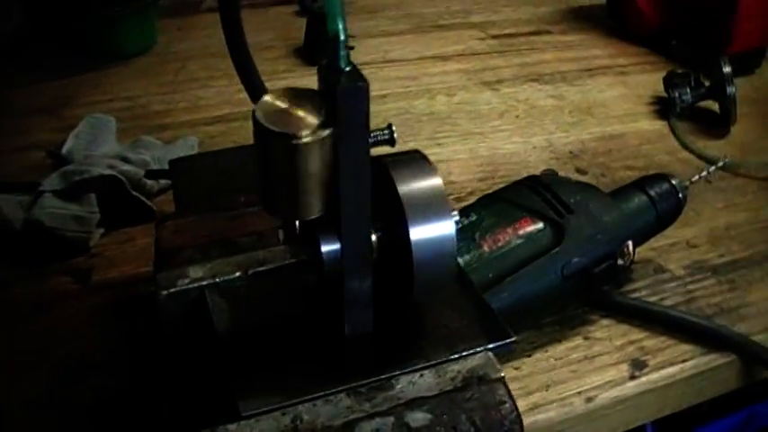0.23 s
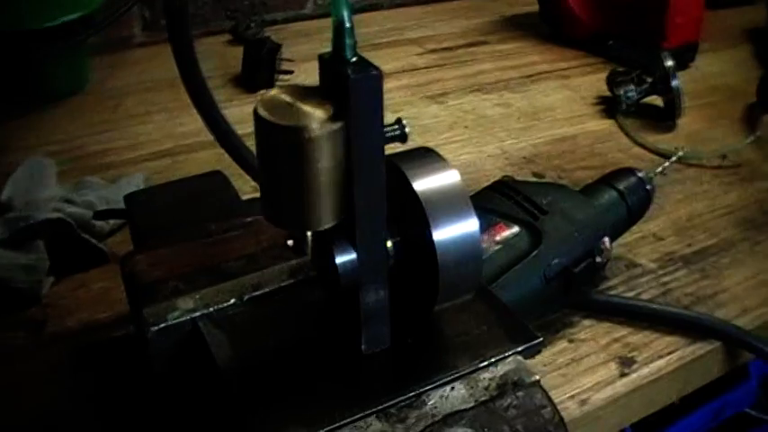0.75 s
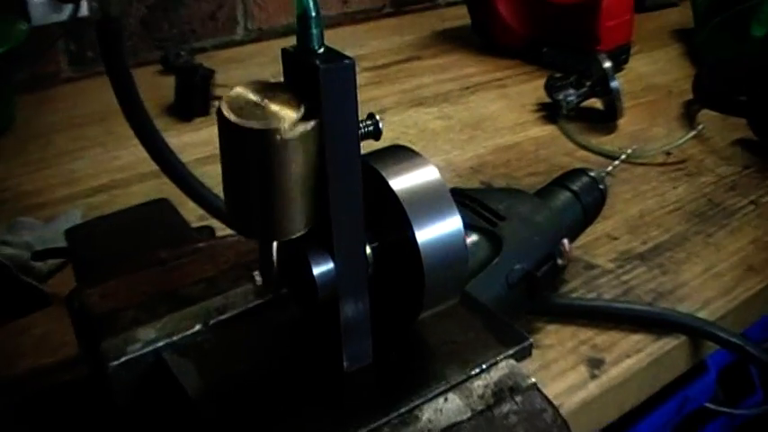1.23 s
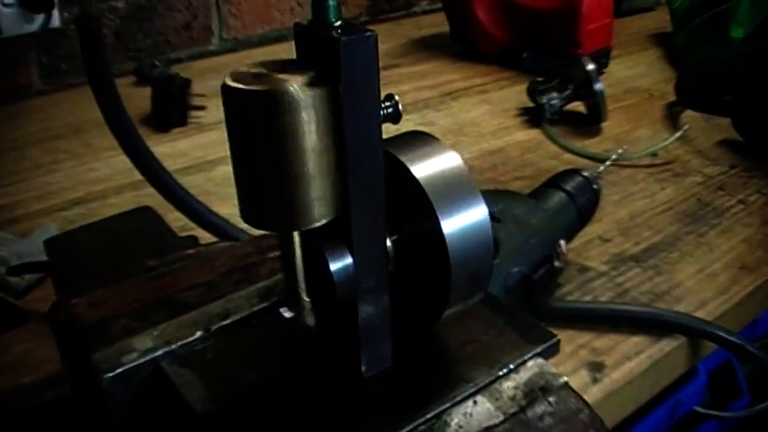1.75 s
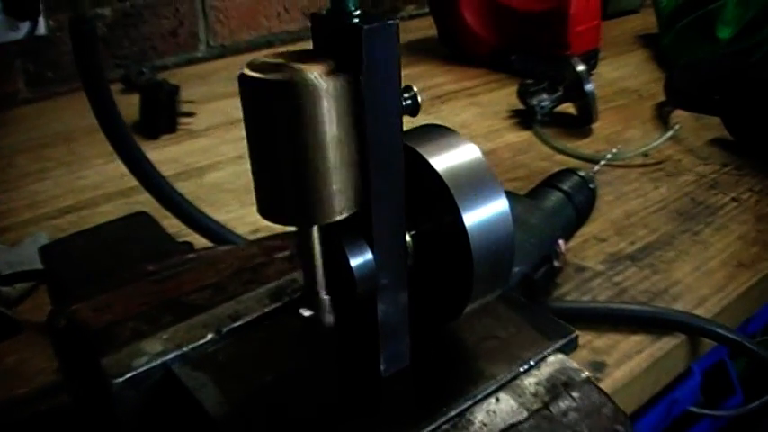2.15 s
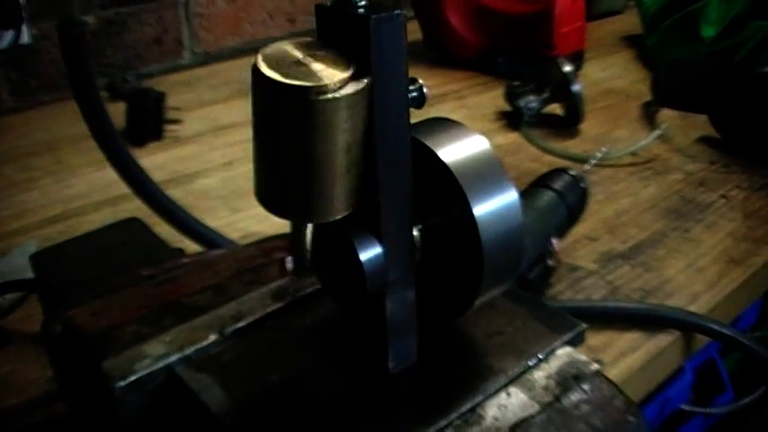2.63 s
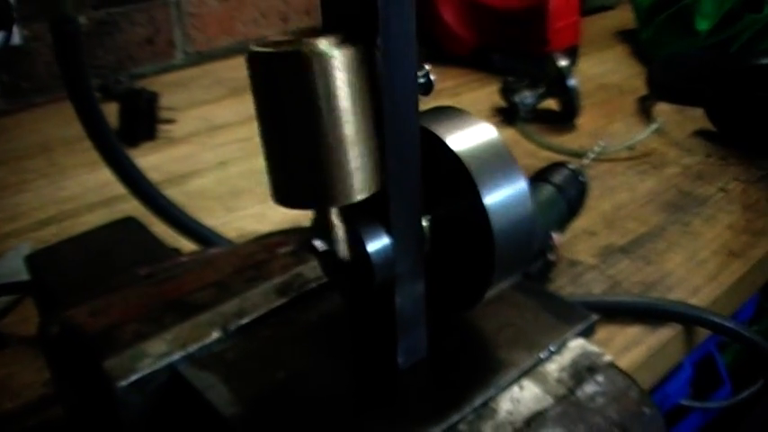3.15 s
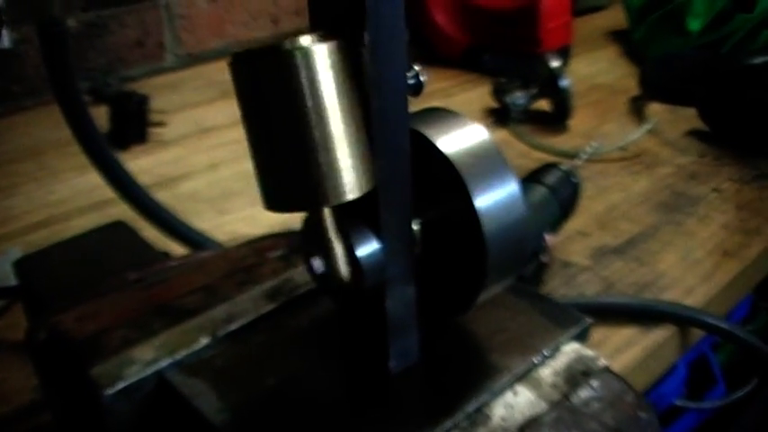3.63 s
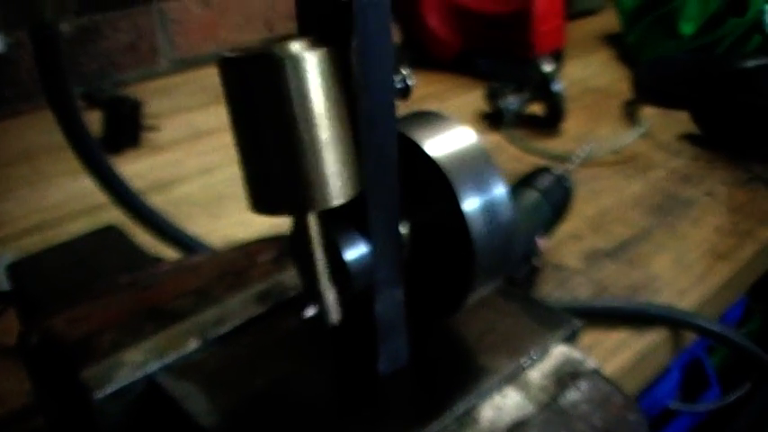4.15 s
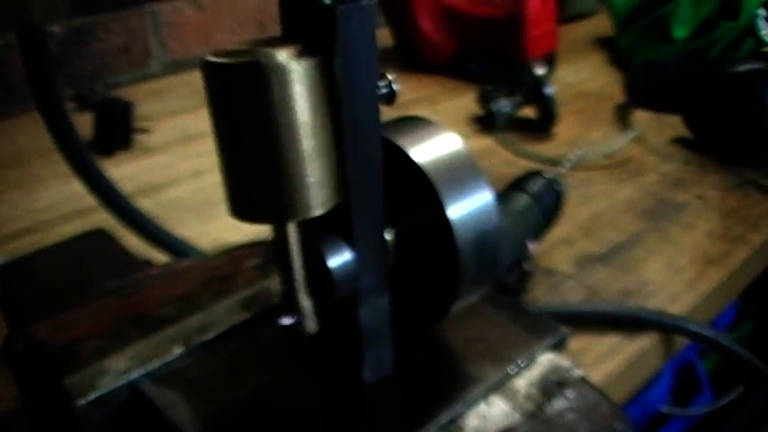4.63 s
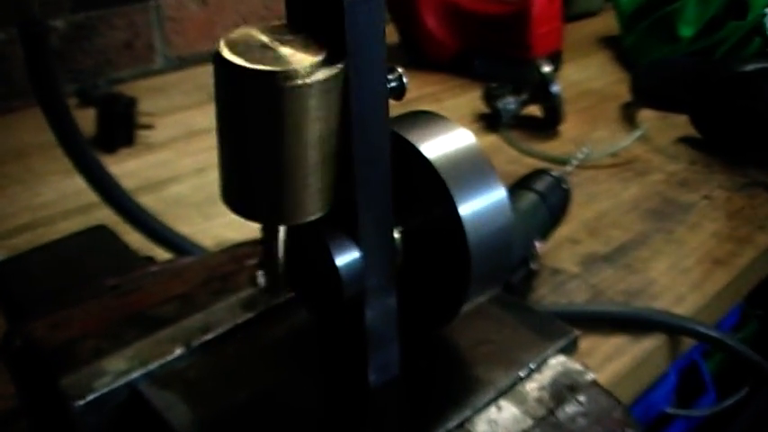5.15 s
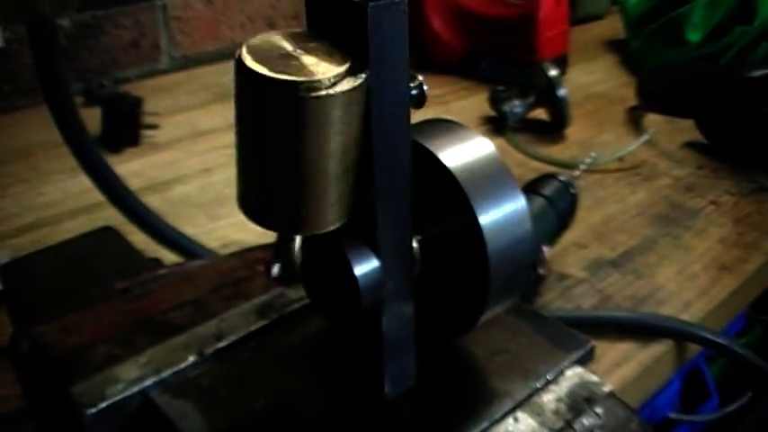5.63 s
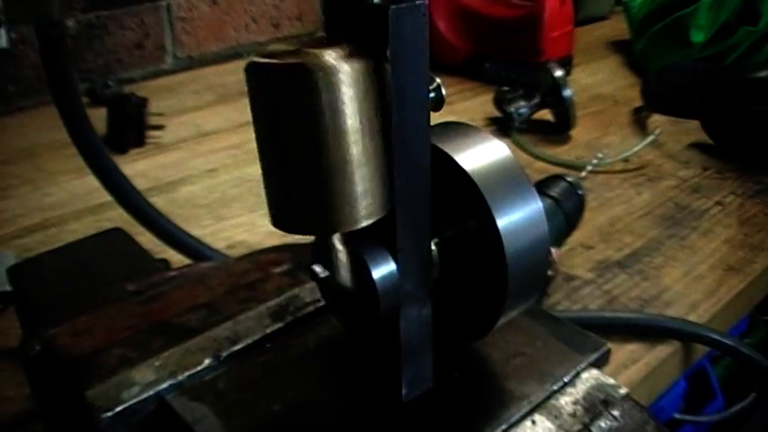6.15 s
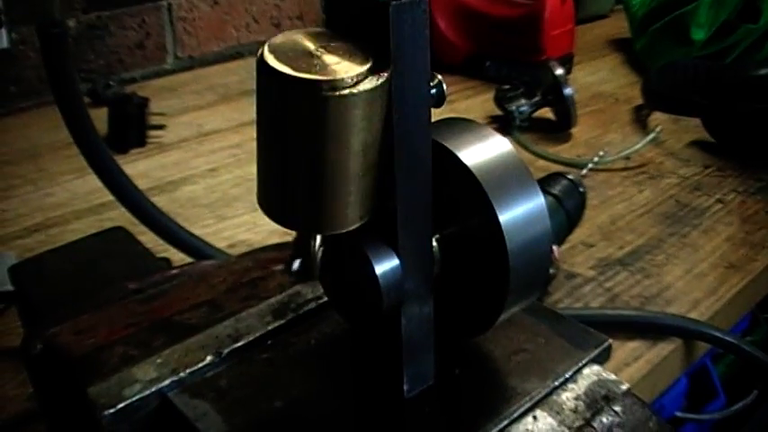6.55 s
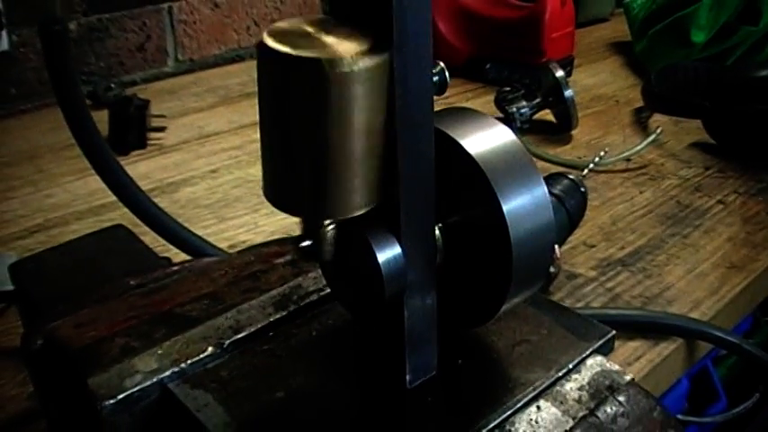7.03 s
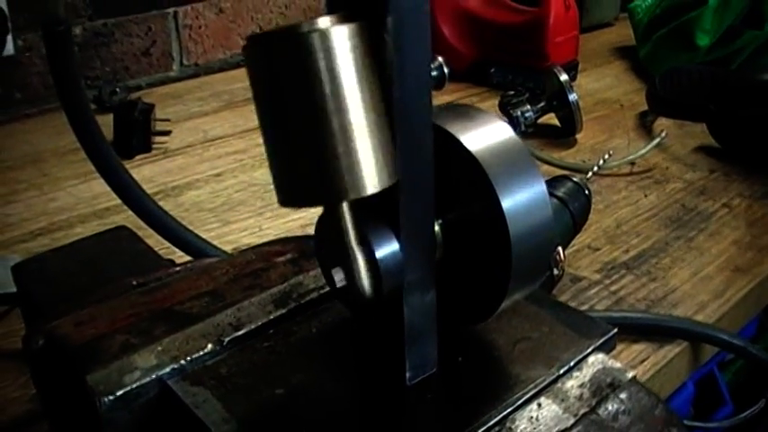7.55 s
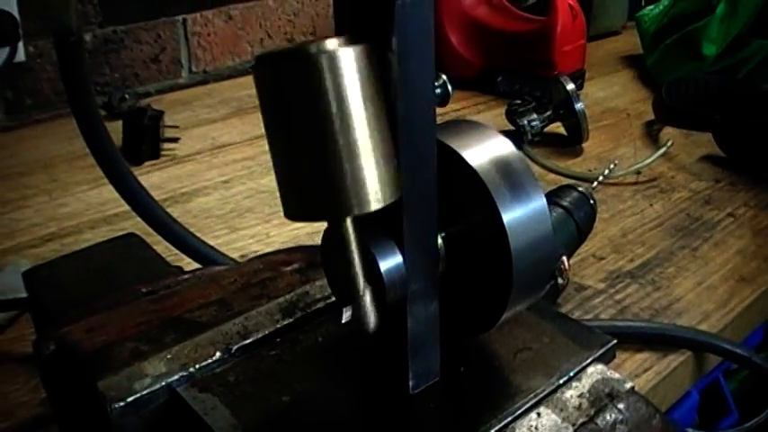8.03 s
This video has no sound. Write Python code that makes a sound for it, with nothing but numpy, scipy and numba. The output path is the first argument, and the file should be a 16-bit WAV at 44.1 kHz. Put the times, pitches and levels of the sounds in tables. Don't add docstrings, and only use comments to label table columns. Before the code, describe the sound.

A small metal air engine knocks and clicks rapidly on a workbench, puffing exhaust and hissing, slowing from six to about four beats a second.

```python
import sys
import numpy as np
from scipy import signal
from scipy.fft import rfft, irfft
from scipy.io import wavfile
from scipy.ndimage import uniform_filter1d
from numba import njit

SR = 44100
rng = np.random.default_rng(int(sys.argv[2]) if len(sys.argv) > 2 else 0)


def pcm_store(signal):
    levels = np.round(np.clip(np.atleast_2d(signal), -1, 1) * 32767)
    wavfile.write(sys.argv[1], SR, levels.astype(np.int16).T)


def level_to_linear(level):
    exponent = np.asarray(level, float) / 20
    return 10 ** exponent


N = 365588


def level(x, db):
    return x * level_to_linear(db) / np.sqrt(np.mean(x ** 2))


def colour(x, points, share=1):
    hz, db = np.transpose(points)
    bins = np.fft.rfftfreq(x.shape[-1], 1 / SR) + 1
    gain = level_to_linear(share * np.interp(np.log(bins), np.log(hz), db))
    return irfft(rfft(x) * gain, x.shape[-1])


@njit
def svf(x, hz, width):
    y, b, l = np.empty(len(x)), 0., 0.
    for i in range(len(x)):
        g, k = np.tan(np.pi * hz[i] / SR), width / hz[i]
        v = (b + g * (x[i] - l)) / (1 + g * (g + k))
        b, l, y[i] = 2 * v - b, l + 2 * g * v, k * v
    return y


def flutter(rate_hz, spread_db):
    k = int(SR / rate_hz)
    steps = np.repeat(rng.standard_normal(N // k + 1), k)
    return level_to_linear(spread_db * uniform_filter1d(steps, k)[:N])


def strike(times, peak_db, hz, t60, db, scatter_db, rise_s, size, order=0):
    t = np.arange(size) / SR
    bank = np.sin(2 * np.pi * np.outer(hz, t)) * np.exp(-np.log(1000) * np.outer(1 / np.asarray(t60), t))
    bank *= (1 - np.exp(-t / rise_s)) ** 2
    swing = (-1.) ** (order * np.arange(len(hz)))
    mode_gain = level_to_linear(db + scatter_db * rng.standard_normal((len(times), len(hz))))
    rings = (swing * mode_gain) @ bank
    out = np.zeros(N + SR + size)
    for s, top_db, ring in zip(times, peak_db, rings):
        i = int((s + 1) * SR)
        out[i:i + size] += ring * level_to_linear(top_db) / np.abs(ring).max()
    return out[SR:SR + N]


def passes(turn, place):
    return np.flatnonzero(np.diff((turn - place) // 1)) / SR


def at(curve, s):
    return curve[(np.maximum(s, 0) * SR).astype(int)]


def control(table):
    return np.interp(np.arange(N) / SR, *np.transpose(table))


# frequency in Hz, level in dB per Hz.
SHOP = [(20, -16), (60, -11.5), (214, 1.5), (466, -4.5), (936, -8.5), (1550, -8.5), (2000, -18),
        (3000, -18), (9000, -46), (12500, -46), (15700, -48)]
SHOP_DB = -51
HUM_HZ, HUM_WIDTH_HZ, HUM_DB = 68.4, 13, -68


def workshop():
    mid, side = rng.standard_normal((2, N))
    hush = level(colour(np.array([mid + 0.5 * side, mid - 0.49 * side]), SHOP), SHOP_DB)
    centre = np.full(N, 1. * HUM_HZ)
    hum = [level(svf(n, centre, 1. * HUM_WIDTH_HZ), HUM_DB) for n in (mid + 0.92 * side, mid - 0.97 * side)]
    return hush + hum


# time in seconds, speed in turns per second.
SPEED = [
    (0, 6.1433),
    (.5, 6.1503),
    (1.2, 5.6527),
    (2, 4.9515),
    (2.8, 4.5146),
    (3.5, 4.3253),
    (4.2, 4.2745),
    (5, 4.3321),
    (6, 4.3765),
    (8.29, 4.4141),
]
START_TURN, IDLE_TURNS_S = .1033, 4.35


def crank():
    speed = control(SPEED)
    return START_TURN + np.cumsum(speed) / SR, speed - IDLE_TURNS_S


# time in seconds, force in dB.
BLOW = [(0, -28), (.12, -16.5), (1.15, -16.5), (1.4, -17.5), (2.1, -19), (2.95, -21), (4.2, -20.5),
        (5, -20), (5.35, -19.5), (5.75, -20.5), (6.2, -19), (7.2, -19), (8, -19), (8.25, -17)]


def blow_db(s):
    return at(control(BLOW), s)


# frequency in Hz, T60 in seconds, level in dB from the knock, in dB from the exhaust jolt.
BENCH = [(141.2, 0.17, -33, -2.5), (198, 0.19, -6, -14), (229.3, 0.16, -17, -1.5), (314, 0.15, 3.5, -41),
         (369.5, 0.26, -1.5, -3.5), (449.3, 0.12, 5, 0.5), (489.3, 0.046, 11, 11.5), (590, 0.15, -9, 1.5),
         (654.5, 0.14, 1.5, -4), (764, 0.072, 8, -3), (846, 0.19, -3, -14.5), (876, 0.03, 8, 6.5),
         (1064, 0.11, 2, -43)]
# frequency in Hz, T60 in seconds, level in dB struck by crank pin, cylinder, rod, pivot.
FRAME = [(1188, 0.14, -14.5, -27, -22.5, -19), (1283.5, 0.019, 4.5, -29, -14, -32.5),
         (1392, 0.029, 5.5, 0.5, -24, -5), (1460, 0.014, 3.5, 15, 3.5, 11),
         (1553, 0.024, -54, 11.5, -2.5, 8), (1839, 0.053, -10, 6, -56, 1),
         (2273, 0.012, -9.5, -33, -23, -39)]
# frequency in Hz, T60 in seconds, level in dB.
PIN_RING = [(2260, 0.036, -15), (2860, 0.03, -39), (3010, 0.063, -4.5), (3230, 0.013, -2), (3453, 0.016, 3),
            (3820, 0.0058, 2), (4123, 0.029, -0.5), (4820, 0.0096, -5), (5080, 0.014, -3)]
BLOW_SCATTER_DB = .5
RATTLE_DB, RATTLE_PER_BLOW, RATTLE_SCATTER_DB = -31.5, 2.26, 1


def crank_pin_knock(turn):
    s = np.r_[-START_TURN / SPEED[0][1], passes(turn, 0)]
    chance = rng.standard_normal((2, len(s)))
    force_db = blow_db(s)
    frame_db = force_db + BLOW_SCATTER_DB * chance[0]
    rattle_db = RATTLE_DB + RATTLE_PER_BLOW * (force_db + 20) + RATTLE_SCATTER_DB * chance[1]
    frame, bench = np.transpose(FRAME), np.transpose(BENCH)
    out = strike(s, frame_db, *frame[:3], scatter_db=.6, rise_s=.001, size=6000)
    bench_db = -31.0 + 0.17 * (frame_db + 21)
    out += strike(s, bench_db, *bench[:3], scatter_db=1.7, rise_s=0.0042, size=16000, order=1)
    out += strike(s, rattle_db, *np.transpose(PIN_RING), scatter_db=0.5, rise_s=0.0002, size=3000)
    crack_hz = 2100 + 450 * np.arange(12)
    crack_db = -4 * np.log2(crack_hz / 3000)
    return out + strike(s, rattle_db - 4.0, crack_hz, np.full(12, .008), crack_db,
                        scatter_db=-4, rise_s=.0001, size=1000, order=1)


AFTER_DB, AFTER_DB_PER_SPEED = -16, 10


def pin_chatter_and_jolt(turn, fast):
    after_db = AFTER_DB + AFTER_DB_PER_SPEED * fast
    chatter = colour(rng.standard_normal(N), [(300, -51), (900, 9), (1400, -20), (2300, 4), (3500, 11.5),
                                              (5000, 1.5), (7000, 3.0), (10000, -9), (14000, -55)])
    fade = uniform_filter1d(np.exp(-(turn % 1) / 0.05), size=16)
    s = passes(turn, 0.17)
    hz, t60, db = np.transpose(FRAME)[:3]
    ring = strike(s, -31.5 + at(after_db, s), hz, t60, db - 6 * np.log2(hz / 1300),
                  scatter_db=-4.0, rise_s=0.0022, size=6000)
    return ring + level(chatter, -27.5) * level_to_linear(after_db) * fade


RUMBLE_DB_PER_SPEED = 5.5


def bench_rumble(turn, fast):
    bench, rumble_db = np.transpose(BENCH), RUMBLE_DB_PER_SPEED * fast
    s = np.r_[0, passes(turn, .09)]
    out = strike(s, -38 + 0.63 * at(rumble_db, s), bench[0], bench[1], bench[3],
                 scatter_db=2.5, rise_s=0.0053, size=16000, order=1)
    s = passes(turn, .4)
    return out + strike(s, -52.5 + 0.99 * at(rumble_db, s), *bench[:2, [0, 2]], np.zeros(2),
                        scatter_db=-0.3, rise_s=0.0037, size=16000, order=1)


EXHAUST, INLET = (.09, .107, .47, .58), (.62, .7, 1.005, 1.035)
LEAK_DB_PER_SPEED = -1.5


def ports(turn, fast, shut_db, *open_db):
    places = EXHAUST + INLET
    shut = np.interp(turn, places, (1, 0, 0, 1, 1, 0, 0, 1), period=1)
    levels = (shut_db, *open_db[:2], shut_db, shut_db, *open_db[2:], shut_db)
    return np.interp(turn, places, levels, period=1) + LEAK_DB_PER_SPEED * fast * shut


PUFF_ENDS, PUFF_GONE, PUFF_DB, PUFF_SHUT_DB = 0.16, .2, -41, -71


def puffing(turn):
    return np.interp(turn % 1, (*EXHAUST[:2], PUFF_ENDS, PUFF_GONE), (0, 1, 1, 0))


def exhaust_puff(turn):
    noise = rng.standard_normal((2, N))
    hz = 3850 + 7000 * np.clip(turn % 1 - .1, 0, .09)
    whistle = level(svf(noise[0], hz, 370.0), 0) + level(svf(noise[1], 1.78 * hz, 1300.0), 0.94)
    return whistle * level_to_linear(PUFF_SHUT_DB + (PUFF_DB - PUFF_SHUT_DB) * puffing(turn))


# frequency in Hz, level in dB per Hz.
JET = [(300, -47), (900, -31), (1500, -6), (2400, -14.5), (3300, -9.5), (5200, -7.5), (7000, -6.5),
       (9500, -7.5), (12500, -15.5), (15700, -26)]
BROAD_DB, WHISTLE_DB = (-57.5, -38, -46, -48, -43), (-62, -40, -43, -49, -46.5)
JET_YIELDS_DB = -9
WHISTLE_HZ, WHISTLE_HZ_PER_SPEED, WHISTLE_DB_PER_SPEED = 8900, -230, 1.3


def port_jets(turn, fast):
    noise = rng.standard_normal((2, N))
    broad_db = ports(turn, fast, *BROAD_DB) + JET_YIELDS_DB * puffing(turn)
    whistle_db = ports(turn, fast, *WHISTLE_DB) + WHISTLE_DB_PER_SPEED * fast
    hz = WHISTLE_HZ + WHISTLE_HZ_PER_SPEED * fast
    whistle = svf(svf(noise[1], hz, 3000.0), hz, 3000.0)
    return level(colour(noise[0], JET), 0) * level_to_linear(broad_db) + level(whistle, 0) * level_to_linear(whistle_db)


SLIDE_DB = (-55, -40, -53, -60, -65.5)
SCRAPE_DB, SCRAPE_TURNS = -35, 0.033


def piston_slide(turn, fast):
    scrape_db = SCRAPE_DB - 20 / np.log(10) * (turn % 1) / SCRAPE_TURNS
    slide_db = np.maximum(ports(turn, fast, *SLIDE_DB), scrape_db)
    noise = rng.standard_normal(N)
    body = [(hz, 4 / t60, db - 3.5) for hz, t60, _, db in BENCH]
    body += [(m[0], 3 / m[1], m[2] - 1.5) for m in FRAME]
    slide = sum(level_to_linear(db) * level(svf(noise, np.full(N, 1. * hz), 1. * width), 0) for hz, width, db in body)
    gain = level_to_linear(slide_db + 0.67 * RUMBLE_DB_PER_SPEED * fast)
    return level(slide, 0) * gain * flutter(rate_hz=43, spread_db=0.0)


# time in seconds, change in dB.
PIVOT_ACCENTS = [
    (1.38, 4),
    (1.57, 3),
    (1.76, -2),
    (1.95, 1),
    (5.56, 1.5),
    (7.61, 2.5),
    (7.84, 4),
    (8.07, 2),
]


def accents(s):
    when, db = np.transpose(PIVOT_ACCENTS)
    return (np.abs(s[:, None] - when) < .05) @ db


# frequency in Hz, T60 in seconds, level in dB for cylinder, rod, pivot.
TICK_RING = [(2280, 0.0069, -3.5, -17, -13), (3090, 0.0049, -6.5, 1, -7), (4740, 0.004, 3, 7, -3.5),
             (5844, 0.016, -16.5, -32, -14.5), (6830, 0.0067, -7.5, 0, -0.5), (7400, 0.004, 5.5, -6, 7.5),
             (8740, 0.0054, -2, 9, -6.5)]
# place in turns after the knock, shift in turns per squared turn/s above idle,
# first contact in seconds.
TAP_PLACES = [
    (.8865, .006, 0),
    (.2165, .02, .95),
    (.323, -.004, .8),
]
# level in dB at idle, dB per turn/s above idle, dB per dB of blow, scatter in dB.
TAP_RINGS = [
    (-29, -1.8, -0.05, 1.3),
    (-24, -2.5, -1.15, 1.2),
    (-27, -3, 0.2, 1.9),
]
# level in dB at idle, dB per turn/s above idle, dB per dB of blow, scatter in dB.
TAP_TICKS = [
    (-24, -0.2, -0.3, 2.9),
    (-24, 2.5, 0.4, 1.75),
    (-18.5, -3, 0.2, 1.7),
]
# time in seconds, change in dB.
SEAT = [(0, 2.5), (2, 3), (2.45, 4), (3.45, 5), (3.65, -1.5), (4.3, 3.5), (4.8, -5), (5.4, -3), (5.8, 1.5),
        (7, -1), (7.6, 0.5), (8.29, 3)]
UPPER_FRAME_HZ = 1700
# cylinder, rod, pivot; the last is dB of ring per dB of seat
TAP_WANDER_TURNS, RING_LAG_S, RING_PER_SEAT = (.002, .002, .004), (0, .0012, 0), (0.25, .01, 0.46)


def taps(turn, fast):
    frame, tick, bench = np.transpose(FRAME), np.transpose(TICK_RING), np.transpose(BENCH)
    out = np.zeros(N)
    for k, (place, shift, first_s) in enumerate(TAP_PLACES):
        s = passes(turn, place + shift * fast ** 2)
        s = s[s > first_s]
        s = s + TAP_WANDER_TURNS[k] * rng.standard_normal(len(s)) / IDLE_TURNS_S

        def force(db, per_speed, per_blow, scatter_db):
            chance = rng.standard_normal(len(s))
            return db + per_speed * at(fast, s) + per_blow * (blow_db(s) + 20.5) + scatter_db * chance

        seat_db = at(control(SEAT), s)
        frame_db = force(*TAP_RINGS[k]) + RING_PER_SEAT[k] * seat_db
        tick_db = force(*TAP_TICKS[k]) + (k == 2) * accents(s)
        mix_db = frame[3 + k] + np.outer(seat_db, frame[0] > UPPER_FRAME_HZ)
        bounce = s + 0.000791 + 0.0028 * rng.random(len(s))
        out += strike(s + RING_LAG_S[k], frame_db, *frame[:2], mix_db, scatter_db=1.5, rise_s=0.00094, size=6000)
        out += strike(bounce, frame_db - 9.0, *frame[:2], mix_db, scatter_db=-2, rise_s=0.00063, size=6000)
        out += strike(s, frame_db - 18.0, *bench[:3], scatter_db=1.0, rise_s=0.0086, size=16000, order=1)
        out += strike(s, tick_db, tick[0], 0.74 * tick[1], tick[2 + k],
                      scatter_db=1.0, rise_s=0.00051, size=1500)
        out += strike(bounce, tick_db - 10.5, *tick[:2], tick[2 + k],
                      scatter_db=1.0, rise_s=0.00042, size=1500)
    return out


def port_face_ticks(turn, fast):
    frame, tick = np.transpose(FRAME), np.transpose(TICK_RING)
    out = np.zeros(N)
    for place, tick_db in ((.15, -42), (.42, -46), (.5, -44.5), (.555, -50), (.69, -45.5)):
        s = passes(turn, place)
        out += strike(s, tick_db + 0 * s, *frame[:2], frame[4], scatter_db=5.5, rise_s=0.0019, size=6000)
    s = passes(turn, 0.44)
    click_hz = np.array([9700, 11500, 13000, 14500])
    out += strike(s, -47 - 12 * np.abs(at(fast, s) - 1.05), click_hz, np.full(4, .003), np.zeros(4),
                  scatter_db=8, rise_s=.0001, size=400)
    s = passes(turn, .148)
    spit_db = -33 + 3 * rng.standard_normal(len(s))
    return out + strike(s, spit_db, *tick[:3], scatter_db=23, rise_s=0.00017, size=1500)


ROOM_DB, ROOM_T60_S, ROOM_TREBLE_T60_S = -13, 0.14, 0.18


def walls(engine):
    t = np.arange(SR // 2) / SR
    noise = rng.standard_normal((3, 2, len(t)))

    def fade(t60, wait_s):
        return np.exp(-np.log(1000) * t / t60) * (t > wait_s)

    low = colour(noise[0] * fade(ROOM_T60_S, 0.0028),
                 [(100, 10.0), (600, 8.0), (1400, 3.5), (2300, -20.0), (4500, 5.0), (9000, -25)])
    high = colour(noise[1] * fade(ROOM_TREBLE_T60_S, 0.0068),
                  [(1500, -24), (4500, -24.0), (9000, 7.5), (15000, -3)])
    near = colour(noise[2, 0] * fade(0.031, .001), [(800, -16), (1500, -8), (2200, 13), (4000, 10.0),
                                                    (8500, 11.5), (12000, 20), (15000, 12.5)])
    tail = low + high + np.array([near, -near])
    tail *= level_to_linear(ROOM_DB) / np.sqrt(np.sum(tail ** 2, axis=1, keepdims=True))
    return signal.fftconvolve(engine[None], tail, axes=1)[:, :N]


# frequency in Hz, left minus right in dB.
LEFT_LEAN = [(60, 1.0), (110, 1.0), (200, 1.0), (380, 1.5), (700, 2.0), (1290, 1.0), (2380, 0.5),
             (4400, 0.5), (8120, 2.0), (15000, 2.5)]


def scene():
    turn, fast = crank()
    engine = crank_pin_knock(turn) + pin_chatter_and_jolt(turn, fast) + bench_rumble(turn, fast)
    air = exhaust_puff(turn) + port_jets(turn, fast)
    engine += air * flutter(rate_hz=250, spread_db=1.0) + piston_slide(turn, fast)
    engine += taps(turn, fast) + port_face_ticks(turn, fast)
    direct = np.array([colour(engine, LEFT_LEAN, 1 / 2), colour(engine, LEFT_LEAN, -1 / 2)])
    return workshop() + direct + walls(engine)


def band_limit(x):
    return signal.sosfilt(signal.butter(12, 15780, fs=SR, output="sos"), x)


# frequency in Hz, gain in dB.
MICROPHONE = [(20, -7), (60, -1), (120, 0.5), (12000, -0.5), (15000, -4), (16500, -8)]
TOP_HZ = 15750


def record(dry):
    top_cut = signal.ellip(10, .2, 70, TOP_HZ, fs=SR, output="sos")
    mix = signal.sosfilt(top_cut, colour(dry, MICROPHONE))
    return band_limit(mix)


dry = scene()
out = record(dry)
pcm_store(out)
```